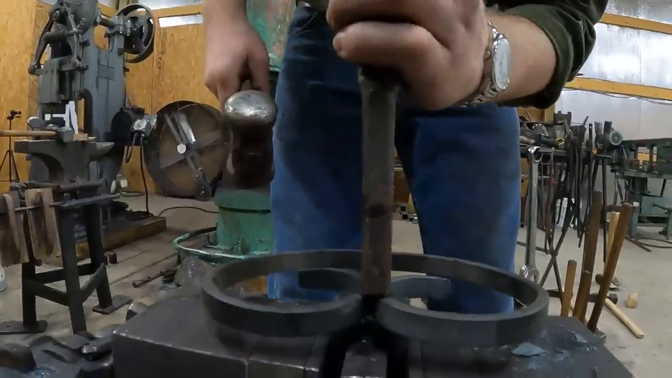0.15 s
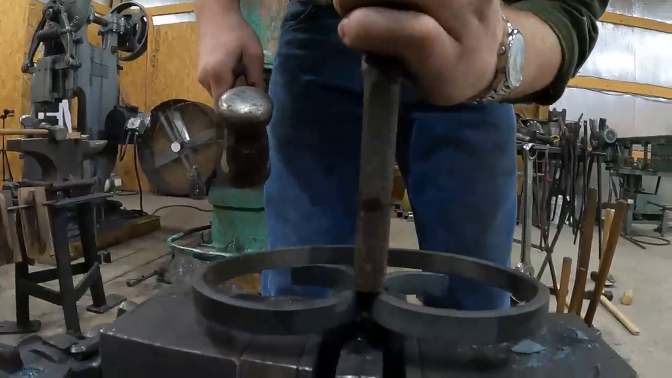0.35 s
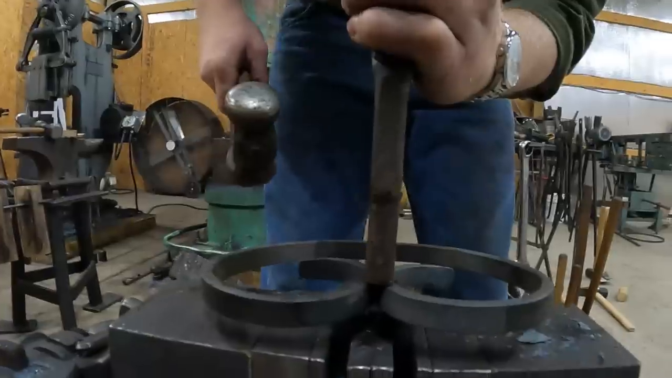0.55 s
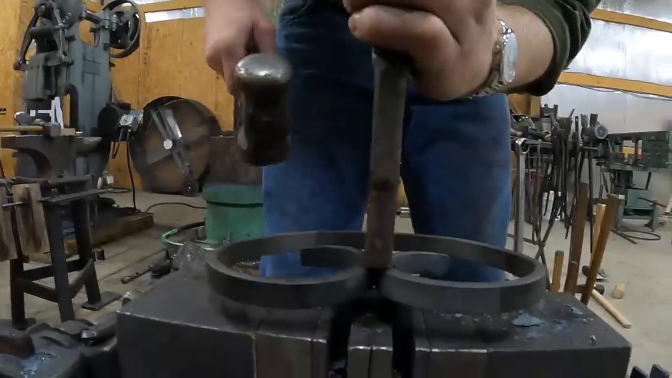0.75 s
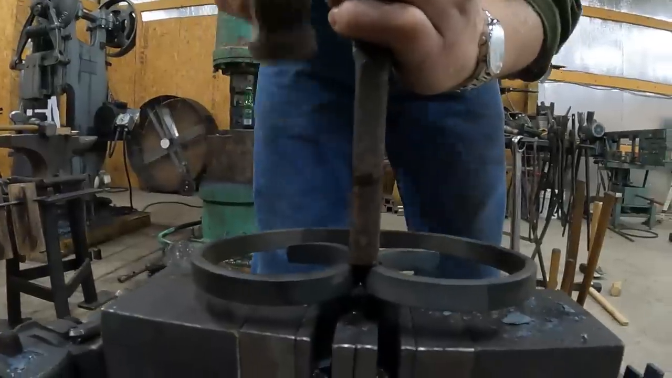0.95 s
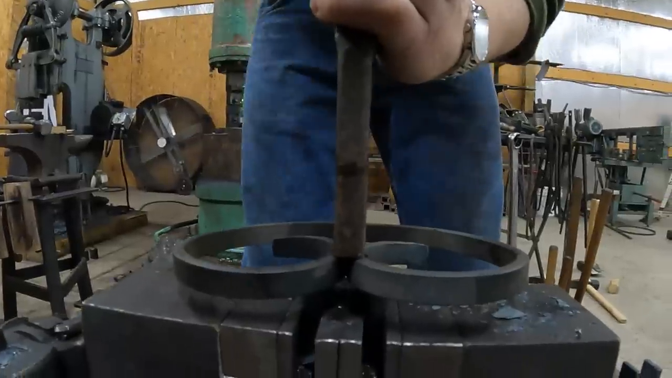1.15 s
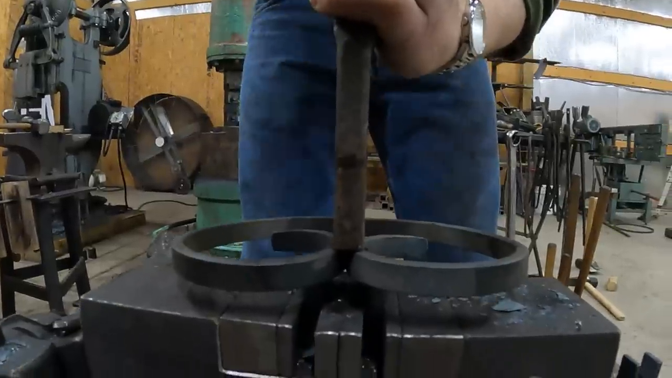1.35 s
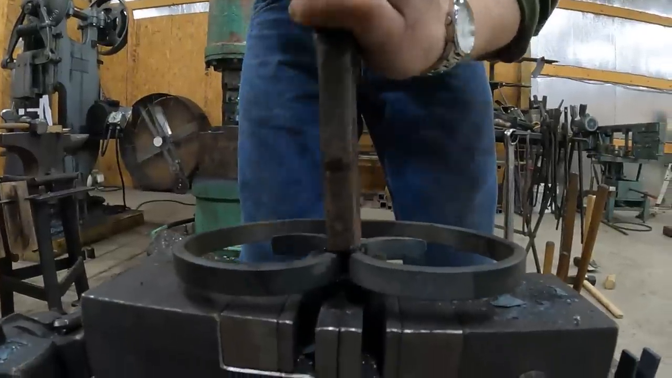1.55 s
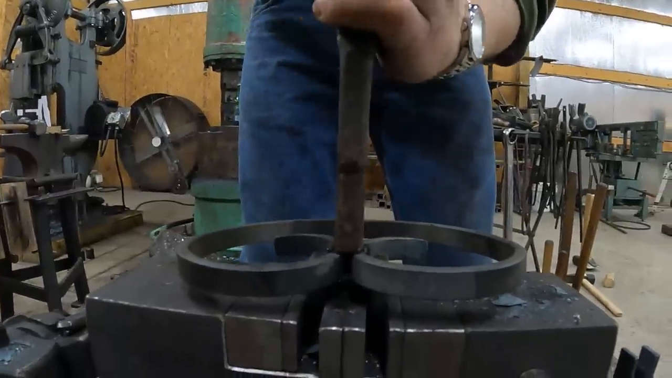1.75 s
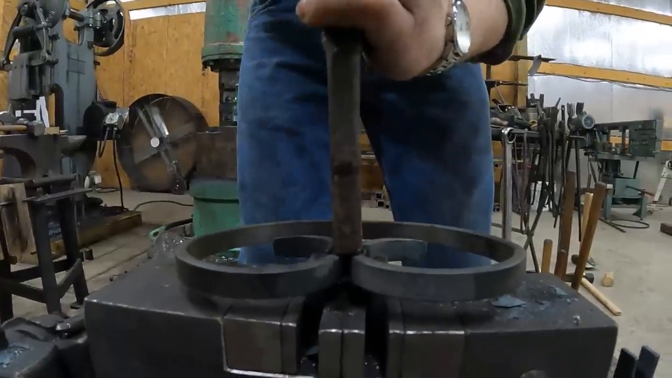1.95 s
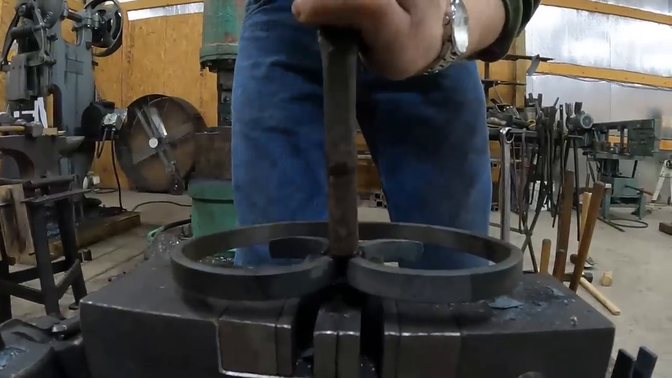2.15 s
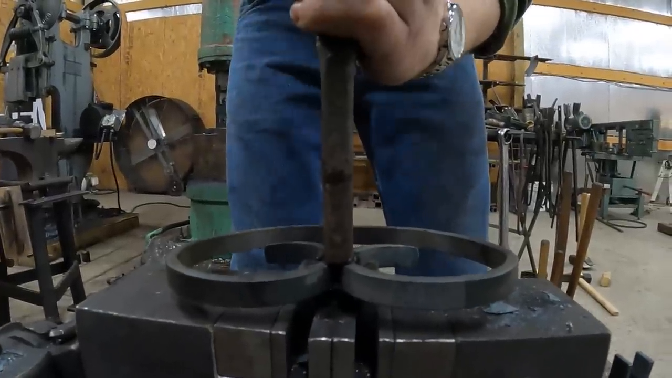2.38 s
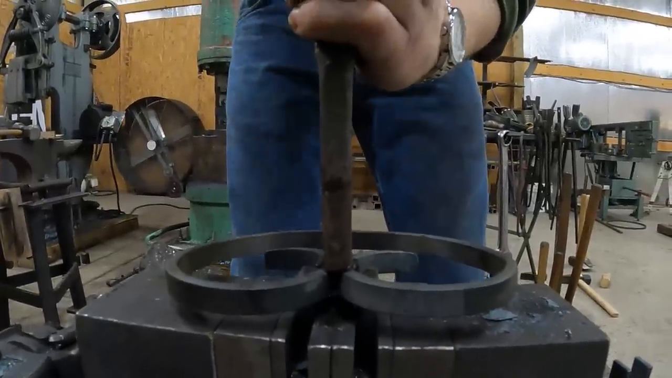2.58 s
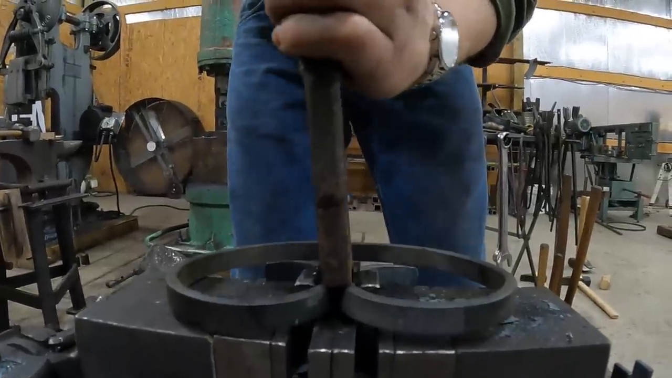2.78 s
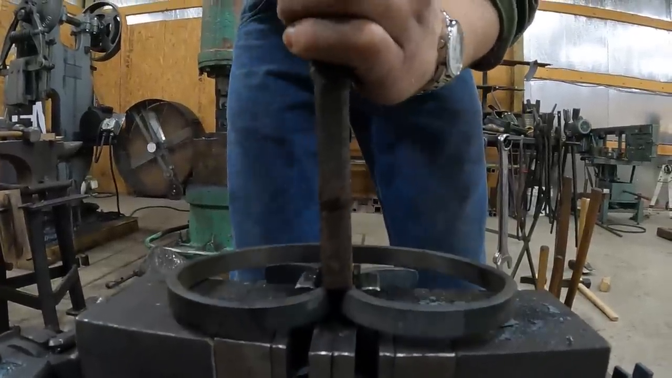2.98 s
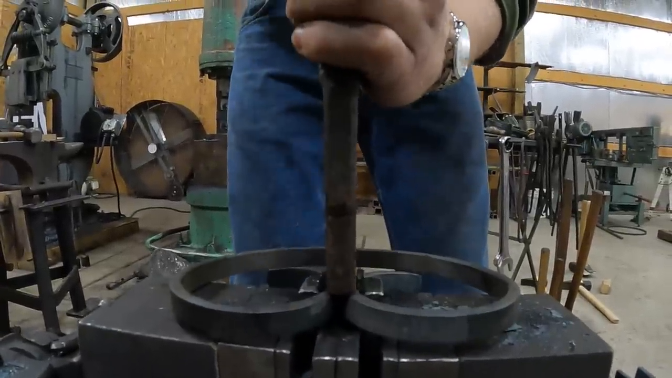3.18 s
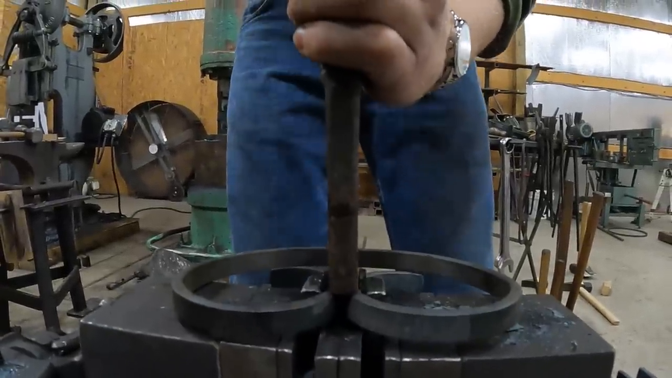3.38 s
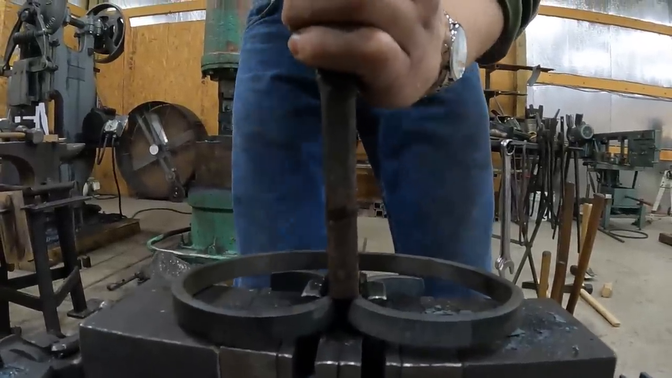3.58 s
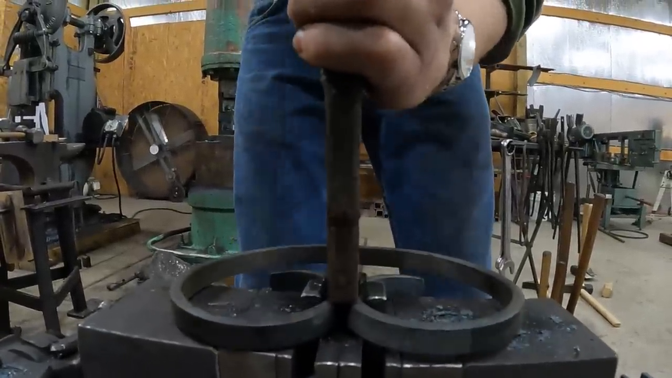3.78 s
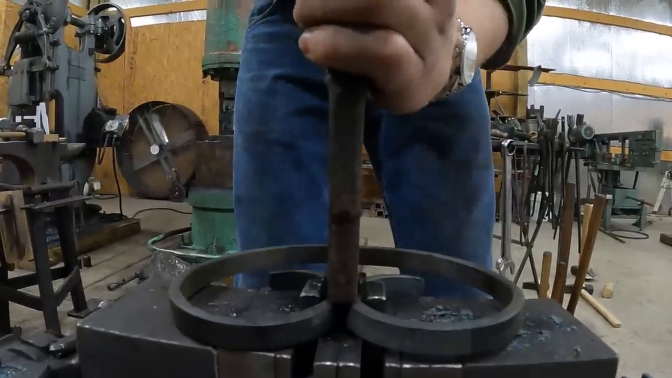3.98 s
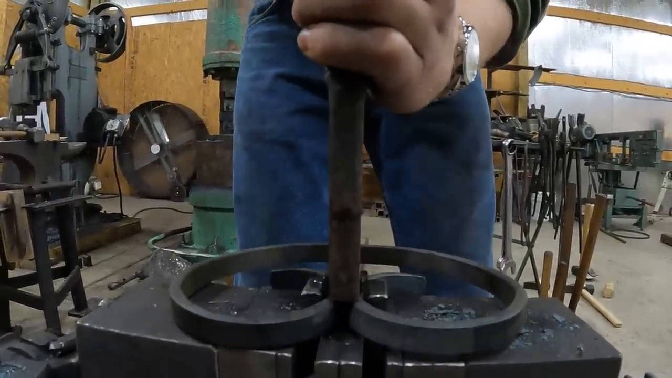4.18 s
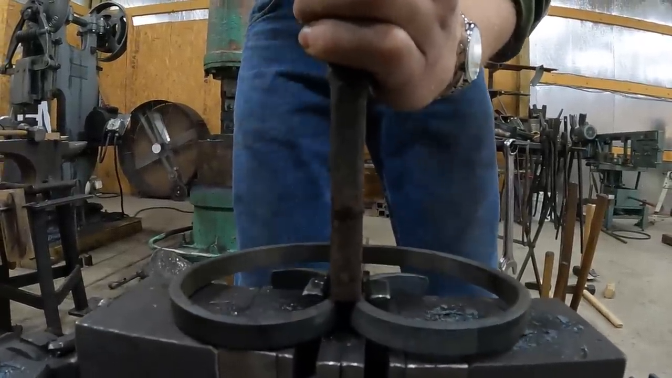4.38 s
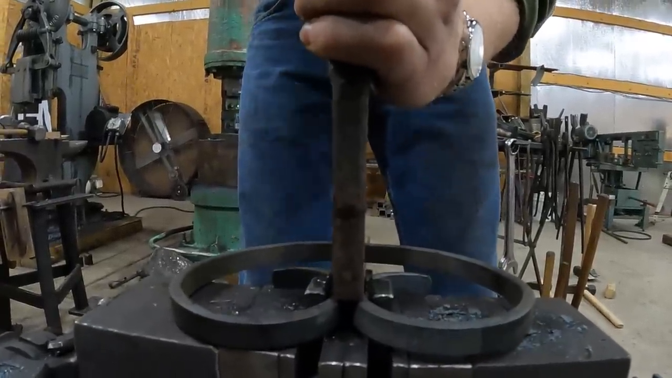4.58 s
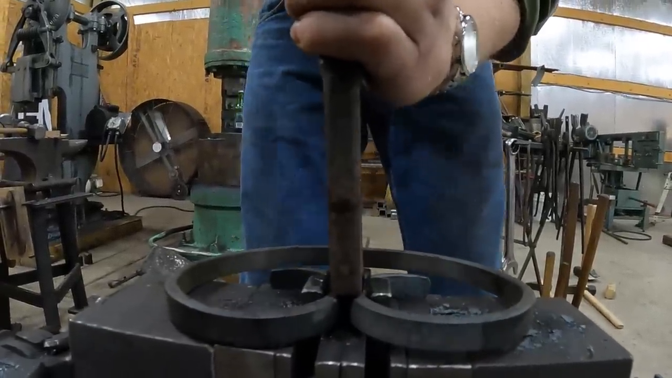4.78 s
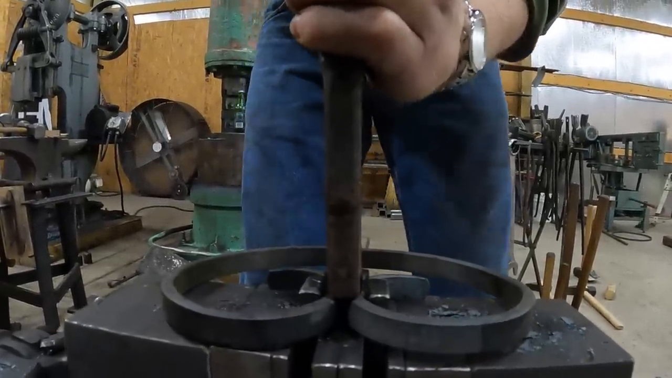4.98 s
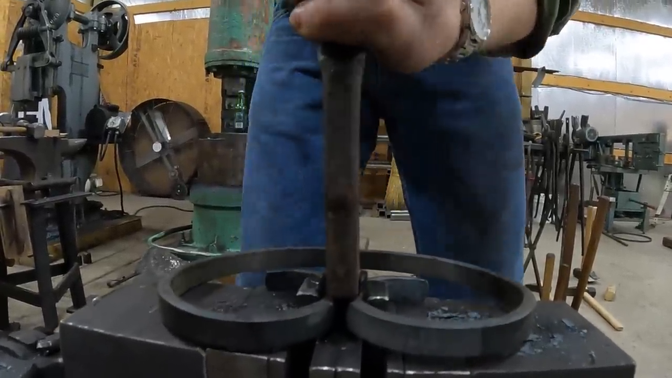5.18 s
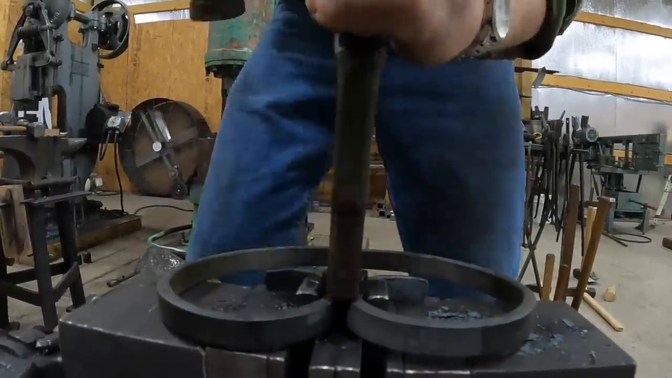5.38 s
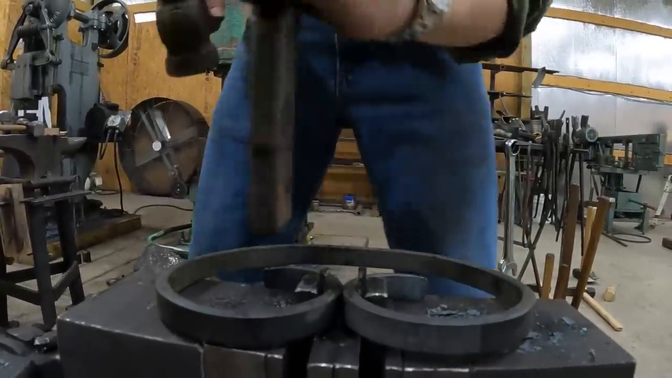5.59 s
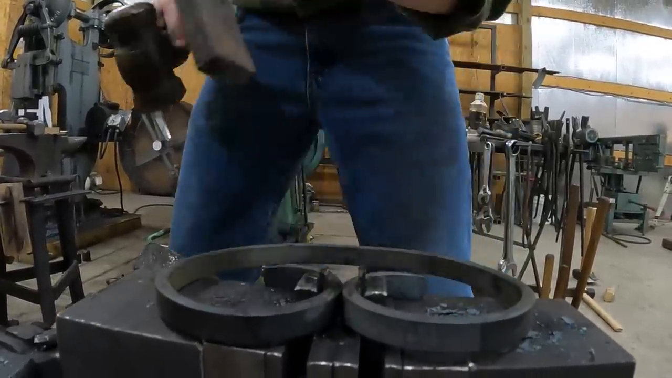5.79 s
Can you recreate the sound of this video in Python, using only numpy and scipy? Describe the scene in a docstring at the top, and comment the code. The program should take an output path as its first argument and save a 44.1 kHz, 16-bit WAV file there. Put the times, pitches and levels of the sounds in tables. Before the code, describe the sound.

Very close, from a microphone on the anvil: nearly two seconds of faint rumble, hiss, dull bumps on the right and small metal clicks, then four overpowering hammer strikes on steel. Each is preceded by a tiny rushing swell, hits with a saturated clang and rings for about a second. Background ducks after the blows, stereo narrows to the centre, and a dull clack and faint ticks close it.

```python
"""A hammer drives a hand-held punch onto steel rings on an anvil, four blows, in a large workshop.
The microphone stands on the anvil: noise bursts give the contact, decaying resonances and tones the steel and stand.
A swell of thin ringing noise rises just ahead of each blow; filtered noise gives the hall after it.
Small touches of steel, mount knocks, rumble and hiss fill the pauses.
A limiter ducks mids and treble after each blow, and after the first one the stereo image closes to the centre."""
import sys
import numpy as np
from scipy import signal
from scipy.io import wavfile

SR = 44100
rng = np.random.default_rng(int(sys.argv[2]) if len(sys.argv) > 2 else 0)


def master(y):
    """Save y as 16-bit WAV."""
    cut = np.clip(np.atleast_2d(y).T, -1, 1)
    pcm = np.round(cut * 32767)  # scale
    wavfile.write(sys.argv[1], SR, pcm.astype(np.int16))


N = 257544
TIME = np.arange(N) / SR  # s

# hammer blows: start_s, crack_db, swell_db, swell_tone_hz, swell_tone_db, thud_db, stand_and_low_tail_db,
# low_mid_tail_db, treble_tail_db, crack_below_700_hz_db
BLOWS = [(1.742, 13, -11.5, 2330, -22, -10, -20, -29, -10, -9.5),
         (2.916, 10.5, -12, 2250, -20, -1, -21.5, -28.5, -7, 5),
         (3.947, 10, -11.5, 1820, -17.5, -6.5, -14, -13, -5.5, -1.3),
         (4.922, 8.5, -10.5, 3143, -11.5, -3, -16, -7, -8, 4)]
# steel touching steel: start_s, level_db, centre_hz, width_hz, t60_s, steel_ring_db, left_minus_right_db
TOUCHES = [(0.083, -27, 778, 260, 0.042, -58, -1), (0.081, -49, 2370, 120, 0.092, -70, .1),
           (0.41, -47, 590, 890, 0.012, -52, -14), (0.468, -64, 2500, 1000, 0.14, -50, -6),
           (.526, -55, 2890, 884, 0.097, -43.5, 0), (0.543, -51, 2930, 900, 0.02, -34.5, -5),
           (0.548, -43, 810, 890, 0.05, -72, -4.5), (0.561, -59, 2950, 890, 0.014, -41.5, -4),
           (.870, -43.5, 1360, 500, 0.083, -55, -7), (.872, -45, 2410, 690, 0.073, -70, -2),
           (0.888, -47, 576, 710, 0.56, -68, -11.5), (.928, -35.5, 2300, 1100, 0.016, -69, 2),
           (0.964, -42.5, 620, 410, 0.095, -57, -14), (0.987, -40.5, 2650, 200, 0.046, -62, 4),
           (2.312, -45.5, 674, 584, 0.031, -79, -10), (3.502, -49, 695, 590, 0.036, -80, -8),
           (4.53, -51.5, 750, 600, 0.016, -76.5, 0.2), (4.56, -53, 695, 600, 0.014, -75, -2.1),
           (5.089, -18.5, 1100, 1200, 0.014, -70, -13), (5.569, -54.5, 4440, 6300, 0.024, -51.5, -2),
           (5.669, -57.5, 4420, 8200, 0.98, -74, -2), (5.69, -53, 790, 904, 0.14, -51, -1)]
# modes of punch, rings and anvil: pitch_hz, t60_s, width_hz, then level_db in blow 1, 2, 3 and 4
STEEL = [(608.5, 1.37, 174, -37, -30, -33.5, -39.5), (750, 1.3, 200, -32, -36.5, -52.5, -32.5),
         (1143.6, 2.6, 36, -72, -71.5, -56.5, -49), (2148, 1.005, 290, -33.5, -31, -30.5, -34),
         (2366, 0.77, 50, -27.5, -25.5, -34, -42.5), (2445, 0.77, 150, -35.5, -24.5, -29, -30),
         (2940, 0.31, 81.5, -31, -34.5, -33, -21.5), (3950, 0.62, 260, -45, -37.5, -34.5, -31.5),
         (4440, 0.62, 110, -34.5, -45.5, -55, -51), (4680, 0.53, 70, -42.5, -27.5, -55, -45),
         (5840, 0.73, 235, -34, -32, -37, -34), (6428, 0.67, 130, -29.5, -23, -26.5, -37.5),
         (7800, .6, 88.5, -40, -35.5, -43, -59.5), (8316, 0.6, 130, -29.5, -46, -32.5, -37.5),
         (11530, 0.6, 200, -36, -40.5, -39.5, -48.5), (12000, .45, 300, -44.5, -42.5, -40, -49)]
# relative spectrum of the contact: frequency_hz, density_db (per Hz)
CRACK = [(180, -30.5), (300, -14), (424, -16.5), (1700, -10), (1840, -12), (2250, -6), (4210, -12),
         (4570, -4.5), (6360, -8), (7020, -8.5), (15500, -34)]
# stereo width: frequency_hz, side_minus_mid_db
WIDTH = [(60, -32.5), (250, -25), (500, -16.5), (2000, -8.5), (4500, -9.5), (8000, -9.5), (14000, 11.5)]
# dull knocks on the right side of the microphone mount: start_s, level_db, pitch_hz
KNOCKS = [(0.04, -42.5, 162), (0.14, -36.5, 165), (0.287, -42, 166), (0.353, -43.5, 169),
          (0.417, -24.5, 170), (0.552, -33, 164), (0.872, -30, 143), (0.929, -30, 175), (.975, -28, 165.3),
          (1.08, -41.5, 165), (1.199, -27, 185.5)]


def amp(db):
    """Decibels to gain."""
    return 10 ** (np.asarray(db) / 20)


def at_hz(points, hz):
    """Read a table along log frequency."""
    points = np.array(points)
    return np.interp(np.log(hz), np.log(points[:, 0]), points[:, 1])


def sine(hz, start_s=0, phase=0.0):
    """Steady tone with its phase counted from start_s."""
    return np.sin(2 * np.pi * hz * (TIME - start_s) + phase)


def dying(start_s, t60_s, rise_s=0.00087):
    """Envelope that starts at start_s, rises softly and falls 60 dB in t60_s."""
    out = np.zeros(N)
    first = int(np.ceil(start_s * SR))
    since = TIME[first:first + int(1.6 * t60_s * SR)] - start_s
    out[first:first + len(since)] = (1 - np.exp(-since / rise_s)) * amp(-60 * since / t60_s)
    return out


def after_blows(levels_db, t60_s, rise_s=0.00087):
    """One dying envelope per blow, each at its own level."""
    return sum(amp(db) * dying(blow[0], t60_s, rise_s) for blow, db in zip(BLOWS, levels_db))


def resonant(hz, width_hz, size=N):
    """Stereo noise twice through one resonance, mid at rms 1; near centre in the lows, wide in the top treble."""
    radius = np.exp(-np.pi * width_hz / SR)
    section = [1, 0, -1, 1, -2 * radius * np.cos(2 * np.pi * hz / SR), radius * radius]
    mid, side = signal.sosfilt([section, section], rng.standard_normal((2, size)))
    side = amp(at_hz(WIDTH, hz)) * side
    return (mid + side * [[1], [-1]]) / mid.std()


def bands(spectrum, wider_db=0):
    """Third-octave bands of stereo noise as (Hz, band); their sum has rms 1."""
    white = rng.standard_normal((2, 2, N))  # neighbouring bands draw on different noise
    edges_hz = 22 * 2 ** (np.arange(30) / 3)
    out = []
    for k, (low, high) in enumerate(zip(edges_hz, edges_hz[1:])):
        hz = np.sqrt(low * high)
        level_db = at_hz(spectrum, hz)
        if level_db > -75:
            band_pass = signal.butter(2, [low, high], "band", fs=SR, output="sos")
            mid, side = signal.sosfilt(band_pass, white[k % 2])
            side = amp(min(at_hz(WIDTH, hz) + wider_db, 0)) * side
            out.append((hz, amp(level_db) * (mid + side * [[1], [-1]])))
    total = sum(band for _, band in out).std()
    return [(hz, band / total) for hz, band in out]


def drift(per_s):
    """Slow random wandering around 0 with spread 1."""
    knots_per_s = 40
    knots = rng.standard_normal(int(len(TIME) / SR * knots_per_s) + 2)
    low_pass = signal.butter(1, np.clip(per_s, 1, 15), fs=knots_per_s, output="sos")
    slow = signal.sosfiltfilt(low_pass, knots)
    return np.interp(TIME * knots_per_s, np.arange(len(slow)), slow / slow.std())


def sunk(creep_back_s=3.1):
    """How far each blow pushes the background down: 1 at the blow, creeping back exponentially."""
    return np.max([(TIME > b[0]) * np.exp(-np.abs(TIME - b[0]) / creep_back_s) for b in BLOWS], axis=0)


def rumble(level_db=-48.5, sink_db=-11.5, lumps_db=5, lumps_per_s=3.9, with_knock_db=-16):
    """Lumpy low noise of the workshop that sinks after the blows; each knock stirs it."""
    # relative rumble spectrum: frequency_hz, density_db (per Hz)
    rumble_spectrum = [(12, -43), (20, -19.5), (65, -1.5), (145, -5.5), (182, -7), (368, -25.5), (448, -26),
                       (849, -43), (1000, -36), (1300, -31.5), (2200, -120)]
    stirred = sum(amp(db + with_knock_db) * dying(s, 0.14, rise_s=0.0052) for s, db, _ in KNOCKS)
    level = amp(level_db + sink_db * sunk() + lumps_db * drift(lumps_per_s)) + stirred
    return level * sum(band for _, band in bands(rumble_spectrum, wider_db=8.0))


def hiss(level_db=-60, sink_db=-16.5, airy_above_hz=2500, airy_sink_db=-0.5):
    """Thin, wide noise that sinks after the blows; its airy part starts bright, then dips briefly."""
    # relative hiss spectrum: frequency_hz, density_db (per Hz)
    hiss_spectrum = [(240, -24), (400, 3), (480, -3), (817, -18), (1050, -3), (2170, -1.5), (3500, -9.5),
                     (5500, -10), (7800, -12.5), (9300, -25.5), (12800, -30.5), (14500, -74)]
    late_return_s, return_length_s = 5.06, 1.2  # near the end the hiss comes back sooner
    dip_s, dip_length_s, dip_db = 0.31, 0.081, -6
    down = sunk() * np.clip(1 - (TIME - late_return_s) / return_length_s, 0, 1)
    dip = np.exp(-((TIME - dip_s) / dip_length_s) ** 2)
    bright_start_db = (TIME < dip_s) * (3.75 - 2.5 * dip)
    airy = amp(airy_sink_db * down + bright_start_db + dip_db * dip)
    noise = sum(band * (airy if hz > airy_above_hz else 1) for hz, band in bands(hiss_spectrum, wider_db=2.0))
    return amp(level_db + sink_db * down) * noise


def hall_tail(tilt_db_per_octave=6.5):
    """Reverberant noise, each band dying at its own rate; each blow weights lows, low mids and treble."""
    # relative spectrum of the hall: frequency_hz, density_db (per Hz)
    tail_spectrum = [(24, -46), (40, -20.5), (63, 9.5), (188, 6.5), (577, -6), (881, -15.5), (1600, -18),
                     (2390, -13.5), (3220, -24), (6480, -33), (8500, -35), (10400, -43.5), (13000, -53.5),
                     (15500, -85)]
    # decay of the hall: frequency_hz, t60_s
    hall_decay = [(50, 0.5), (200, 1.185), (600, 1.48), (1500, 0.79), (3000, 0.45), (6000, 0.64),
                  (12000, 0.24)]
    out = np.zeros((2, N))
    for hz, band in bands(tail_spectrum):
        tilt_db = tilt_db_per_octave * np.log2(max(hz / 1600, 1))
        levels_db = []
        for *_, low_db, mid_db, treble_db, _ in BLOWS:
            weights = [(150, low_db), (550, mid_db), (1600, treble_db)]
            levels_db.append(at_hz(weights, hz) + tilt_db)
        out += after_blows(levels_db, at_hz(hall_decay, hz)) * band
    return out


def knocks(knock_t60_s=0.24, left_share=0.04):
    """The mount rings low for a few cycles, almost all on the right, with a stronger, shorter jolt at the first blow."""
    # the first blow shakes the mount: start_s, level_db, pitch_hz, t60_s
    first_blow_jolt = (1.74, -8, 140, 0.066)
    out = np.zeros(N)
    for s, db, hz, t60_s in [(*row, knock_t60_s) for row in KNOCKS] + [first_blow_jolt]:
        out += amp(db) * dying(s, t60_s, rise_s=0.0065) * sine(hz, s)
        out += amp(db - 3.5) * dying(s, 0.053, rise_s=0.0044) * sine(23.0, s)  # very low push under each
    return out * [[left_share], [1]]


def touches(echo_db=-24.0, echo_t60_s=0.45, ping_db=3.0):
    """Short scuffs of noise around a resonance, which also pings; each scuff has a faint hall tail."""
    out = np.zeros((2, N))
    for s, db, hz, width_hz, t60_s, _, pan_db in TOUCHES:
        span = slice(int(s * SR), int(s * SR) + SR)  # one second
        shape = (dying(s, t60_s, rise_s=0.00062) + amp(echo_db) * dying(s, echo_t60_s))[span]
        scuff = shape * resonant(hz, width_hz, size=SR)[:, :len(shape)]
        ping_level = amp(ping_db) * np.exp(-width_hz / hz)  # broad resonances ping less
        ping = ping_level * (dying(s, t60_s, rise_s=0.00017) * sine(hz, s))[span]
        out[:, span] += amp(db + pan_db * np.array([[.5], [-.5]])) * (scuff + ping)
    return out


def stand_boom():
    """Low modes of the anvil stand as narrow noise, wavering as the hall blurs them."""
    # anvil stand modes: pitch_hz, relative_level_db, t60_s, width_hz
    stand_modes = [(85.7, -2, 0.88, 14), (127.7, -11, 1.8, 11), (165.3, 2, 0.79, 34),
                   (203.6, 2.5, 1.03, 3.3), (236.3, 0, 0.83, 17), (305.2, -20, 1.9, 2.8),
                   (411, -21, 0.43, 5.4), (623.2, -17.5, 1.585, 32)]
    out = np.zeros((2, N))
    for hz, db, t60_s, width_hz in stand_modes:
        levels_db = [blow[6] + db - 5.5 for blow in BLOWS]
        out += after_blows(levels_db, t60_s, rise_s=.025) * resonant(hz, width_hz)
    return out


def thuds(thud_hz=89, t60_s=0.045):
    """The short thud of the stand: a low tone that dies within a few cycles, centred."""
    thud = sum(amp(b[5]) * dying(b[0], t60_s) * sine(thud_hz, b[0], phase=1.0) for b in BLOWS)
    return -thud * np.ones((2, 1))


def steel_ring():
    """Steel modes waver as the hall blurs them; touches ring the steel only briefly."""
    out = np.zeros((2, N))
    touched = sum(amp(t[5]) * dying(t[0], t[4] + 0.0045) for t in TOUCHES)
    for hz, t60_s, width_hz, *levels_db in STEEL:
        touch_db = levels_db[0] + 21.0 - 1.3 * np.log2(hz / 4000)
        shape = after_blows(levels_db, t60_s) + amp(touch_db) * touched
        out += shape * resonant(hz, max(width_hz, 12))
    return out


def clear_ring():
    """The punch's highest modes ring as clean decaying tones."""
    # highest modes of the punch: pitch_hz
    clear_pitches = [11935, 12066, 13921]
    # their decay and strength: t60_s, then level_db in blow 1, 2, 3 and 4
    clear_decays = [(.8, -37.5, -57.5, -30, -56), (.8, -45.5, -62.5, -43.5, -59),
                    (.35, -60.5, -59, -35.5, -50)]
    out = np.zeros((2, N))
    out_of_step = np.array([[0], [1.5]])  # rad; the microphone's two ports hear high tones out of step
    for hz, (t60_s, *levels_db) in zip(clear_pitches, clear_decays):
        out += after_blows(levels_db, t60_s) * sine(hz, phase=out_of_step)
    return out


def swells(length_s=0.047, power=2.48, at_modes_db=6.5, spread_db=6.5, tilt_db=-0.2, count=150):
    """A swell of thin ringing noise, many sines at once, rises about 47 ms ahead of each blow."""
    out = np.zeros((2, N))
    for k, (s, _, swell_db, tone_hz, tone_db, *_, body_db) in enumerate(BLOWS):
        span = slice(int((s - length_s) * SR), int(s * SR))
        time = TIME[span]
        place, phase, size, side = rng.random((count, 4)).T[:, :, None]
        hz = 200 + 15050 * place ** 1.6
        tones_db = at_hz(CRACK, hz) + body_db * (hz < 700) + tilt_db * np.log2(hz / 4000)
        tones_db = tones_db - spread_db * np.log(size + 0.099)  # a few tones stand out
        tones = amp(tones_db) * np.sin(2 * np.pi * (hz * time + phase))
        mid = tones.sum(axis=0)
        off_centre = (tones * amp(at_hz(WIDTH, hz) - 2.5) * (2 * side - 1)).sum(axis=0)
        cluster = amp(swell_db) * (mid + off_centre * [[1], [-1]]) / mid.std()
        # sines at the frequencies of the mode table
        at_modes = sum(amp(mode[3 + k] + at_modes_db) * np.sin(2 * np.pi * mode[0] * time) for mode in STEEL)
        tone = amp(tone_db) * np.sin(2 * np.pi * tone_hz * time)
        climb = np.abs(1 + (time - s) / length_s) ** power
        out[:, span] += climb * (cluster + at_modes + tone)
    return out


def cracks(t60_s=.036):
    """The contact itself: a burst of bright noise, its body below 700 Hz weighted blow by blow."""
    bright = after_blows([blow[1] for blow in BLOWS], t60_s, rise_s=0.002)
    body = after_blows([blow[1] + blow[-1] for blow in BLOWS], t60_s, rise_s=0.002)
    return sum(band * (body if hz < 700 else bright) for hz, band in bands(CRACK))


def scene():
    """All sources at the microphone on the anvil."""
    background = rumble() + hiss() + hall_tail()
    small_sounds = knocks() + touches()
    ringing = stand_boom() + thuds() + steel_ring() + clear_ring()
    return background + small_sounds + ringing + swells() + cracks()


def narrow(x):
    """After the first blow the image closes to the centre, bass first, the top octave staying wide."""
    bass_closes_s, mids_close_s = 1.78, 2.2
    bass_db_per_s, mids_db_per_s, easing_db_per_s = -750, -200, -14
    bass_db = bass_db_per_s * np.clip(TIME - bass_closes_s, 0, .3)
    mids_db = mids_db_per_s * np.clip(TIME - mids_close_s, 0, .3)
    mids_db += easing_db_per_s * np.clip(TIME - bass_closes_s, 0, .5)  # gentle narrowing as the bass closes
    side = (x[0] - x[1]) / 2
    bass = signal.sosfiltfilt(signal.butter(4, 280, fs=SR, output="sos"), side)
    below_top = signal.sosfiltfilt(signal.butter(4, 10200, fs=SR, output="sos"), side)
    side = amp(bass_db) * bass + amp(mids_db) * (below_top - bass) + side - below_top
    return x.mean(axis=0) + side * [[1], [-1]]


def record(dry, split_hz=330, release_db_s=85, dull_hz=9000, cutoff_hz=15850):
    """A limiter on all but the bass, soft clipping, a dull top, a closing image and a steep cut."""
    limit_db, attack_s, top = -6, .0012, .93
    bass = signal.sosfiltfilt(signal.butter(1, split_hz, fs=SR, output="sos"), dry)
    rest = dry - bass
    over_db = np.maximum(20 * np.log10(np.abs(rest).max(axis=0) + 1e-9) - limit_db, 0)
    # the release is a straight line in dB
    held_db = np.maximum.accumulate(over_db + release_db_s * TIME) - release_db_s * TIME
    keep = np.exp(-1 / (attack_s * SR))
    cut_db = signal.lfilter([1 - keep], [1, -keep], np.maximum(held_db, 0))
    clipped = top * np.tanh((bass + amp(-cut_db) * rest) / top)
    dull = signal.sosfilt(signal.butter(1, dull_hz, fs=SR, output="sos"), clipped)
    steep_cut = signal.cheby2(18, 70, cutoff_hz, fs=SR, output="sos")
    return signal.sosfilt(steep_cut, narrow(dull))


dry = scene()
out = record(dry)
master(out)
```